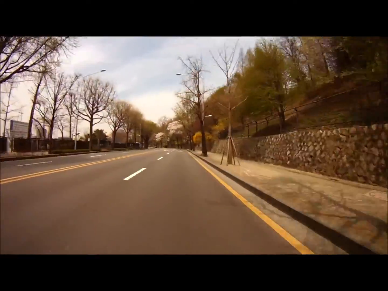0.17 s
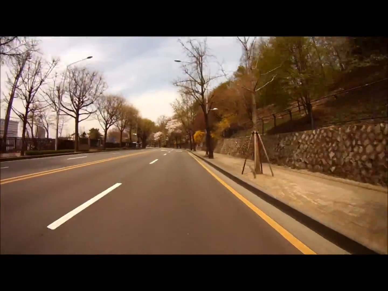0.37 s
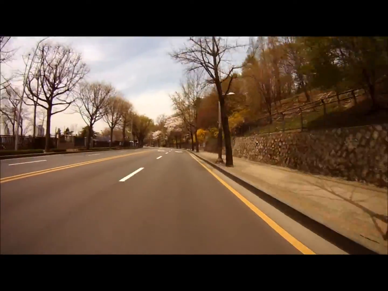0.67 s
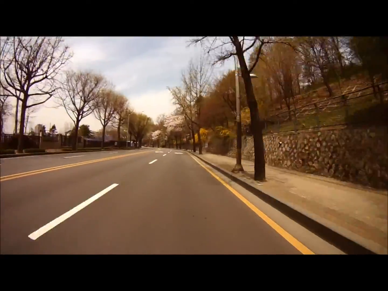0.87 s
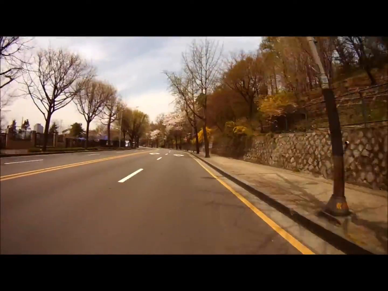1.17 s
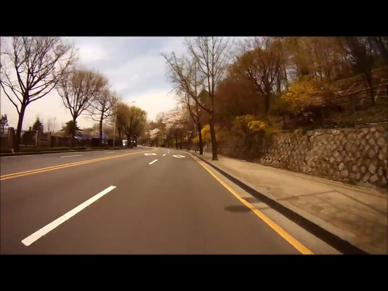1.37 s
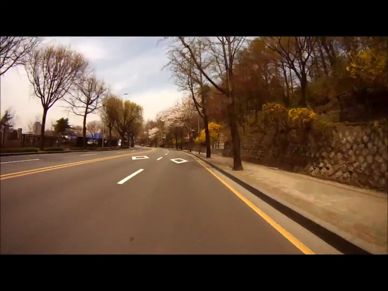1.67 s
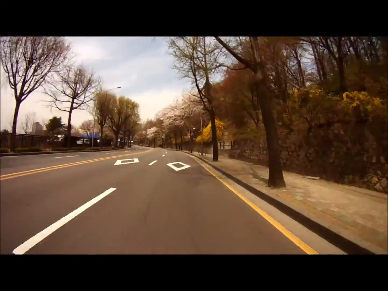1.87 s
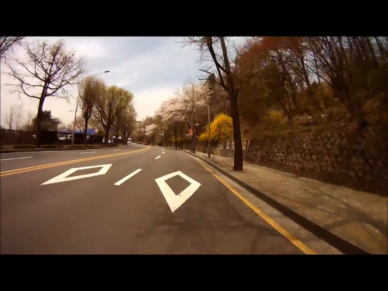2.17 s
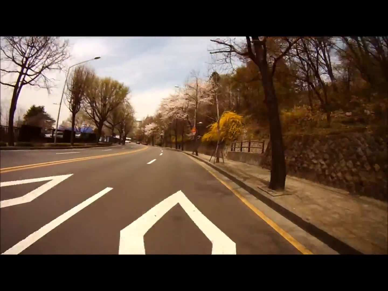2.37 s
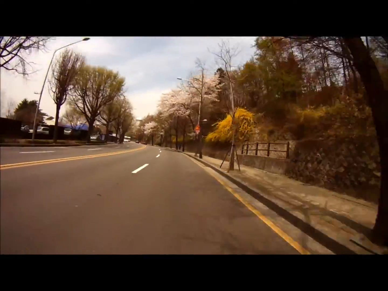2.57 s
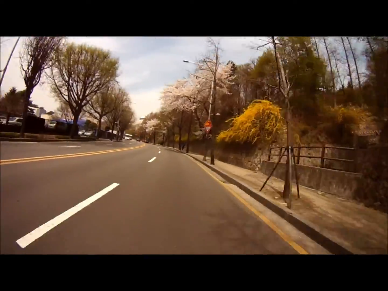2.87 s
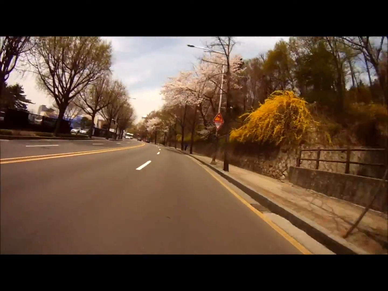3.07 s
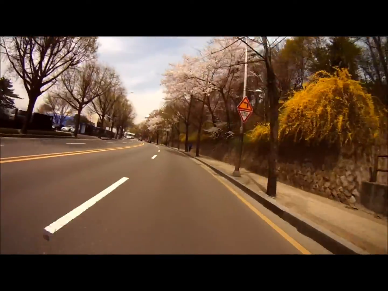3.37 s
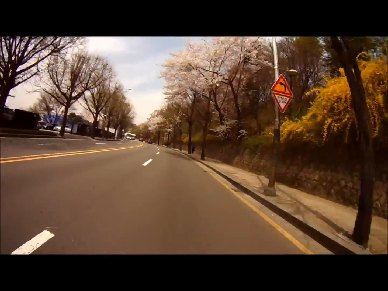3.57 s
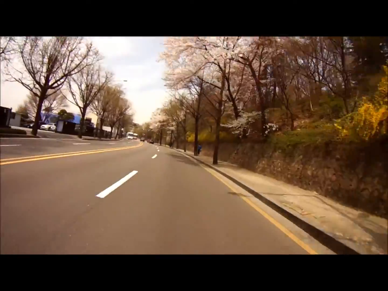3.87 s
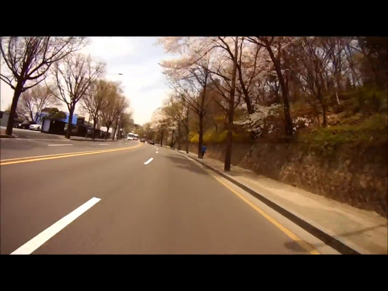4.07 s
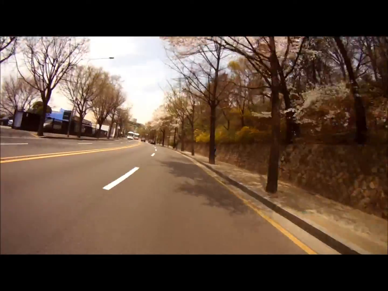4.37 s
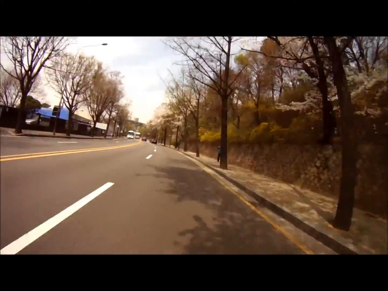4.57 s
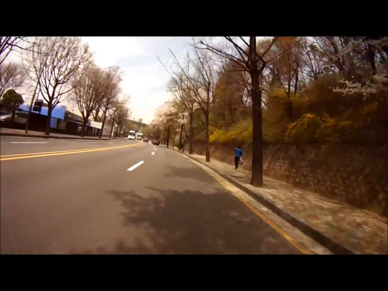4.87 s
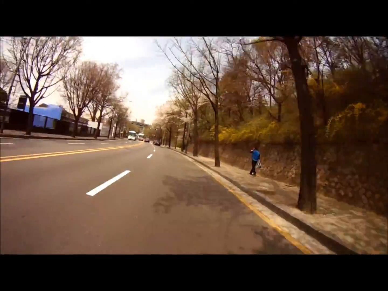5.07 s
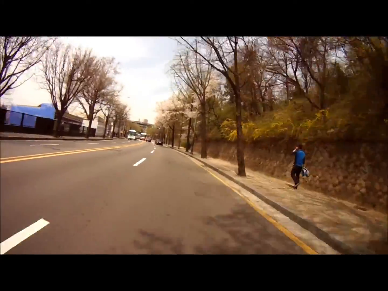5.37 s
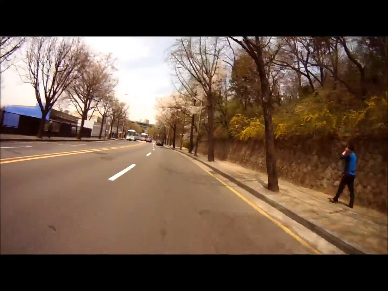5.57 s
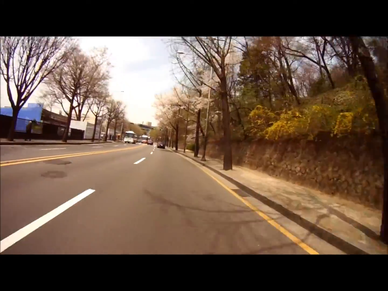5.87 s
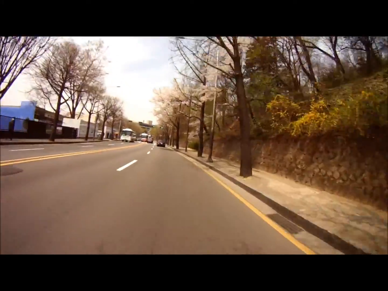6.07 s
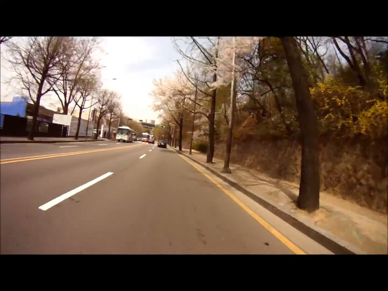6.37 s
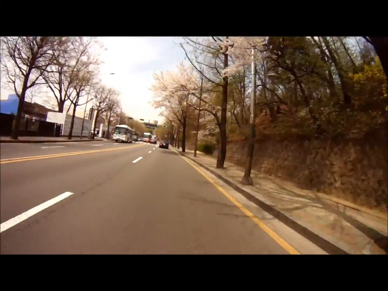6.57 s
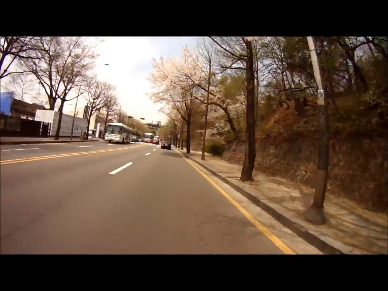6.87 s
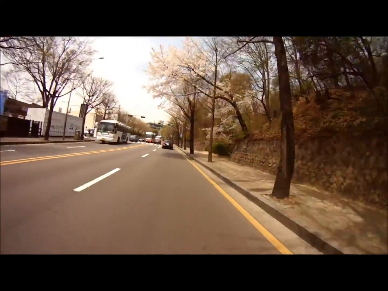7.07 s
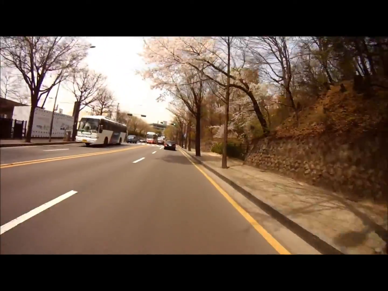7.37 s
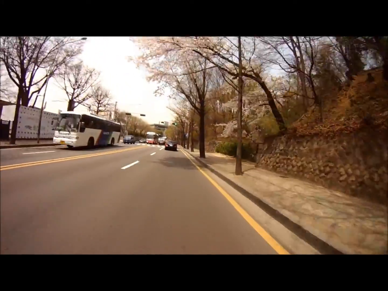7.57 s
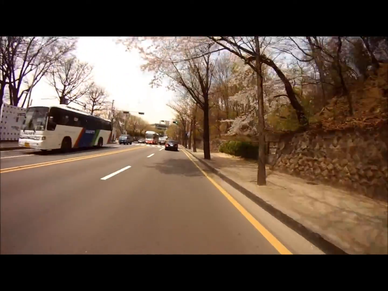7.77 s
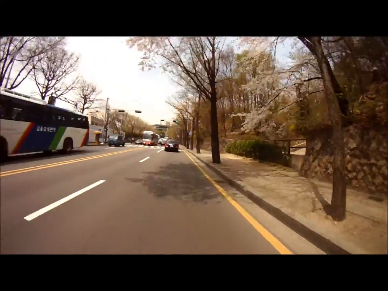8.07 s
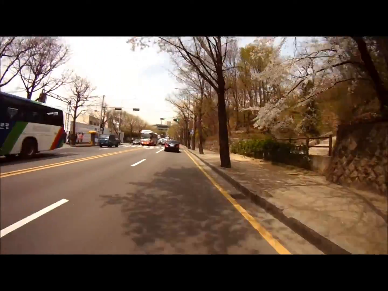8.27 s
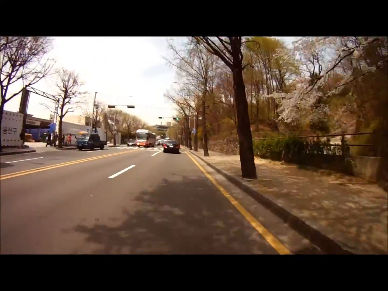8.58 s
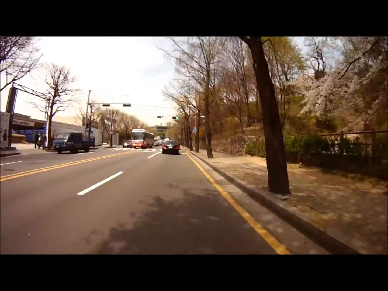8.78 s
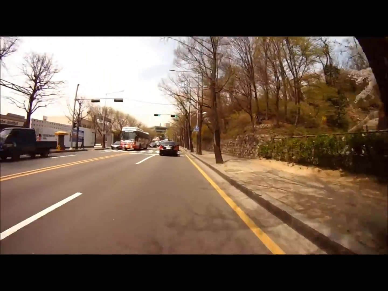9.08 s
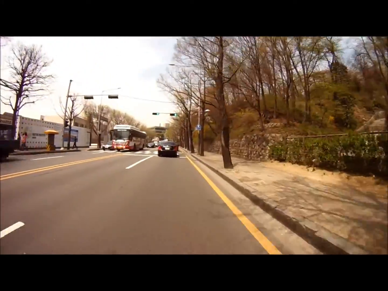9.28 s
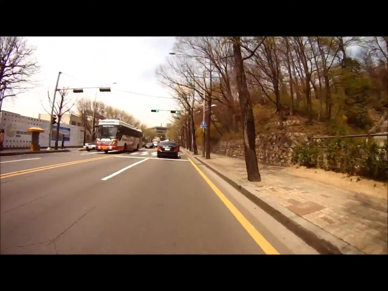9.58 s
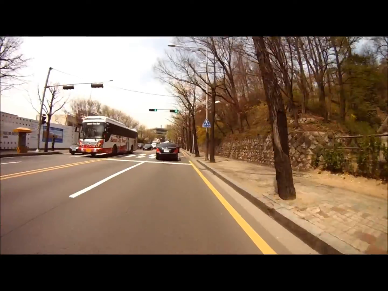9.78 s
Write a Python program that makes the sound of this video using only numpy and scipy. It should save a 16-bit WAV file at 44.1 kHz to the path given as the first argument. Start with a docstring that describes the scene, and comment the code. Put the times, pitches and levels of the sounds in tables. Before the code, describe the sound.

A camera in a closed case on a motorcycle picks up coarse wind hiss, low flutter, tyre roar and a deep engine drone with throbbing mount vibration. The pitch sinks steadily as the bike slows on a city road. Wind falls away sharply after about six seconds, loose parts tick, a hard knock lands near seven seconds, then a downshift lifts the engine briefly before it sinks again.

```python
"""Wind hisses in the microphone port of a closed camera case and buffets it: turbulent noise in flickering bands.
The case rides on a motorcycle that slows down on a city road; wind and road noise sink as it goes.
Its mount swings near 134 Hz as a narrow-band resonator, and amplifies engine and driveline orders at fixed pitches.
Tyre roar and a thin whine come through the case; ticks and knocks are decaying modes, squeaks are gliding tones.
"""
import sys
import numpy as np
from scipy import signal
from scipy.fft import rfft, irfft, next_fast_len
from scipy.io import wavfile
from scipy.ndimage import uniform_filter1d

SR = 44100
rng = np.random.default_rng(int(sys.argv[2]) if len(sys.argv) > 2 else 0)


def persist_wave(psi):
    """Save psi, clipped to +-1, as 16-bit WAV."""
    counts = np.round(np.clip(psi, -1, 1) * 32767).astype(np.int16)
    wavfile.write(sys.argv[1], SR, np.atleast_2d(counts).T)


N = 438354
T = np.arange(N) / SR  # time, s


def undb(db):
    """Level definition: an amplitude ratio is 10^(level / 20 dB)."""
    return 10 ** (np.asarray(db) / 20)


def curves(table):
    """Linear interpolation: the columns of a table are joined by straight lines in time."""
    s, *columns = np.transpose(table)
    return [np.interp(T, s, column) for column in columns]


def lift(hz, modes):
    """Resonance: a body passes everything and adds the power of its modes (f/Hz, width/Hz, level/dB)."""
    power = sum(undb(2 * db) / (1 + (2 * (hz - f) / width) ** 2) for f, width, db in modes)
    return np.sqrt(1 + power)


def walk(rate):
    """Slow random modulation: levels held for 1 / rate s and slewed twice, with a spread near 1."""
    hold = int(SR / rate)
    steps = np.repeat(rng.standard_normal(N // hold + 1), hold)
    return 1.3 * uniform_filter1d(uniform_filter1d(steps, hold), hold)[:N]


def turbulence(shape, modes, shared_db, own_db, rate, tilt_db=0):
    """Broadband turbulence: noise of rms 1 before its octave bands flicker, together and each alone."""
    size = next_fast_len(N)
    hz = np.arange(size // 2 + 1) * SR / size + 1e-3  # offset keeps the logarithm finite
    f, db = np.transpose(shape)
    colour = undb(np.interp(np.log(hz), np.log(f), db, -90, -90)) * lift(hz, modes)
    noise = rfft(rng.standard_normal(size)) * colour
    scale = np.std(irfft(noise, size))
    shared = walk(rate)
    out = 0
    for centre in 2 ** np.arange(np.floor(np.log2(f[0])), np.log2(f[-1]) + 1):
        # neighbouring cosine-squared bands overlap and sum to one
        band = np.cos(np.pi / 2 * np.clip(np.log2(hz / centre), -1, 1)) ** 2
        flicker_db = shared_db * shared + own_db * walk(rate)
        flicker_db = flicker_db + (centre > 3000) * tilt_db  # tilt moves the treble bands only
        out = out + undb(flicker_db) * irfft(noise * band, size)[:N]
    return out / scale


def ring(hz, t60, rise_s):
    """Free decay: one mode dies away by 60 dB in t60; a longer push starts it more softly."""
    t = np.arange(int(t60 * SR)) / SR
    onset = np.sin(np.pi / 2 * np.minimum(t / rise_s, 1)) ** 2
    return np.sin(2 * np.pi * hz * t) * 1000. ** (-t / t60) * onset


def add(out, s, sound):
    """Superposition: a sound is mixed in at time s."""
    i = int(s * SR)
    out[i:i + len(sound)] += sound[:N - i]


SHIFT_S = 0.21  # length of each gradual change
TOP_GEAR_OUT_S, LOW_GEAR_IN_S = 5.9, 7.3


def engaged(s):
    """Gradual engagement: a linear ramp, 0 before time s and 1 once SHIFT_S has passed."""
    return np.clip((T - s) / SHIFT_S, 0, 1)


# Rotation as the ride slows: t/s, crank f/Hz, driveline f/Hz
SPEED = [(0, 86, 86), (1.5, 83.5, 83.5), (1.9, 81.9, 81.9), (2.3, 81.1, 81.1), (3.1, 78.3, 78.3),
         (4.7, 71.1, 71.1), (5.1, 68.3, 68.8), (5.9, 62.9, 65.6), (7.1, 52.3, 53.8), (7.3, 51.5, 53),
         (7.5, 57.8, 51.9), (8.7, 53.6, 47.5), (9.94, 49.2, 43.7)]


def rotation():
    """Rotational kinematics: crank and driveline frequencies over time, Hz."""
    return curves(SPEED)


def speed_db():
    """Speed level: road speed, taken from the driveline, in dB relative to the start."""
    line = rotation()[1]
    return 20 * np.log10(line / line[0])


# Steady wind at the port: t/s, level/dB
WIND = [(0, -26.5), (.6, -26.5), (1.3, -24), (1.69, -25.5), (2.08, -25.5), (2.5, -29.5), (2.85, -26),
        (3.7, -25.5), (4.2, -27.5), (4.6, -30), (5.18, -31), (5.3, -35), (6.19, -37.5), (6.24, -39.5),
        (6.76, -49.5), (8.13, -49), (8.6, -56.5), (9.2, -51.5), (9.94, -54.5)]
CRUISE_DB, SLOW_S = -25.5, 0.54  # wind at cruising speed; time over which the case feels its mean


def steady_wind_db():
    """Mean flow: level of the wind at the port without brief swells or flutter."""
    return curves(WIND)[0]


def pace_db():
    """Temporal averaging: mean wind relative to cruising sets how hard the ride shakes the case."""
    return uniform_filter1d(steady_wind_db(), int(SLOW_S * SR), mode="nearest") - CRUISE_DB


# Spectrum of the microphone's own hiss: f/Hz, relative level/dB per Hz
FLOOR = [(3000, -3.5), (5500, -4), (7000, -5), (8500, -12), (10000, -17.5), (16000, -18)]
FLOOR_DB = -71.5


def floor_hiss():
    """Self-noise: the microphone adds faint, nearly steady noise."""
    return undb(FLOOR_DB) * turbulence(FLOOR, [], .1, .3, 10)


# Short rubs: t/s, length/s, lowest f/Hz, level/dB
SQUEAKS = [(6.488, .022, 2250, -41), (9.448, .016, 1520, -43)]


def squeak():
    """Friction: short rubs whose pitch dips and recovers, roughened by random phase."""
    out = np.zeros(N)
    for s, length, hz, db in SQUEAKS:
        u = np.arange(int(length * SR)) / (length * SR)  # progress through the rub, 0 to 1
        glide = hz * (1 + .08 * (2 * u - 1) ** 2)
        phase = 2 * np.pi * np.cumsum(glide) / SR + .5 * walk(1500)[:len(u)]
        octave = .2 * np.cos(np.pi * u) ** 2 * np.sin(2 * phase)  # its share is largest at both ends
        add(out, s, undb(db) * np.sqrt(np.sin(np.pi * u)) * (np.sin(phase) + octave))
    return out


# Taps of a loose part: t/s, level/dB, then relative level/dB near 2 kHz (before a 5 dB cut), 4 kHz, 5 kHz
TICKS = [(6.2675, -36.5, -2, -16, -19), (6.336, -31.5, 0, -10, -16), (6.3945, -46, 2, -15, -18),
         (6.6129, -33.5, 3.5, -5, -8), (6.7006, -40.5, -2, -10, -19), (6.741, -44, 7, -20, -16),
         (7.4856, -31, 1, -19, -25), (7.638, -51, 6, -14, -4), (7.672, -53, 6, -4, -8),
         (7.78, -53, 4, -11, -11), (7.936, -52, 6, -11, -10), (8.0775, -53, 3, -11, -9),
         (8.1489, -54, 12, -7, -2), (8.2716, -54, 6, -10, 2), (9.105, -52, 3, -11, -12)]
# Modes struck by each tap: f/Hz, relative level/dB, t60/s
TICK_MODES = [(1640, 2, 0.025), (1830, 5, 0.038), (2270, 0.5, 0.039), (3124, 4.5, 0.022), (3910, 7, 0.027),
              (4700, 7, 0.02), (5130, -0.5, 0.018)]


def ticks():
    """Modal excitation: a loose part taps the case, ringing short bright modes balanced anew at each tap."""
    out = np.zeros(N)
    detunings = rng.standard_normal((len(TICKS), len(TICK_MODES)))
    for (s, db, low_db, mid_db, top_db), detuning in zip(TICKS, detunings):
        for (hz, mode_db, t60), a in zip(TICK_MODES, detuning):
            if hz < 2700:
                share_db = low_db - 5
            elif hz < 3600:
                share_db = 0
            else:
                share_db = mid_db if hz < 4400 else top_db
            add(out, s, undb(db + mode_db + share_db) * ring(hz * (1 + 0.015 * a), t60, 0.002))
    return out


# Spectrum of the tyre roar: f/Hz, relative level/dB per Hz
ROAR = [(170, -31), (250, -10), (340, -18), (480, -13.5), (620, -7.5), (760, -11), (1100, -21.5),
        (1550, -20.5), (2900, -40.5), (3400, -47), (3900, -38), (5000, -39.5), (6000, -51), (9000, -72)]
# Resonances of the case: f/Hz, width/Hz, level/dB
CASE = [(527, 56, 6), (633.4, 57, 7), (780, 100, -0.5), (876, 21, 9), (1060, 76, 7)]
ROAD_DB, ROAD_SLOPE, ROAD_POWER = -32.5, 0.27, 0.71  # roar at cruise; dB per dB of wind; power of road speed
WHINE_DB, WHINE_SLOPE = -61.5, .3  # whine at cruise; dB per dB of wind
WHINE_FADES_S, WHINE_FADE_DB_S = 9.3, 10  # start of its fade; dB per s


def road():
    """Structure-borne transmission: tyre roar comes through the case, with a thin whine of a small buzzing part."""
    roar = turbulence(ROAR, CASE, 0.9, 0.73, 16)
    roar_db = ROAD_DB + ROAD_SLOPE * pace_db() + ROAD_POWER * speed_db()
    whine = turbulence([(2900, -8.5), (3140, -3.0), (3400, -12.5)], [(3170, 130, 18)], 2.2, .1, 22)
    fade_db = WHINE_FADE_DB_S * np.maximum(T - WHINE_FADES_S, 0)
    whine_db = WHINE_DB + WHINE_SLOPE * pace_db() - fade_db
    return undb(roar_db) * roar + undb(whine_db) * whine


# Engine load: t/s, relative level/dB
LOAD = [(0, -3.5), (1, -2), (3, -0.5), (4, 1), (5, -2.5), (5.8, -10), (6.4, -6.5), (7.2, -12.5), (7.5, -10),
        (8.2, -10.5), (9.94, -8)]
# Crank tones: order, level/dB before load and mount
CRANK = [(1, -38), (2, -44), (3, -58)]
# Driveline tone: order, level/dB before unloading and mount
DRIVELINE = [(4, -59.5)]
# Gear meshes of the top gear: order of the driveline, level/dB before mesh level and mount
TOP_GEAR = [(5.75, -64), (6, -62), (6.65, -62), (8, -62), (8.57, -60)]
# Gear meshes of the low gear: order of the driveline, level/dB before mesh level and mount
LOW_GEAR = [(2.47, -42), (4.95, -67)]
# Resonances of the mount: f/Hz, width/Hz, level/dB
MOUNT = [(54, 14, 5), (77, 9, 14), (133, 14, 5), (168, 30, 9), (220, 10, 18), (260, 16, 8), (333, 16, 14),
         (570, 160, 13)]
TOP_MESH_DB, TOP_MESH_SLOPE = 1.5, .5  # at cruise; dB per dB of wind
LOW_MESH_DB, FREE_DB = -2.5, -41  # low mesh; drop of a mesh that is out of gear
UNLOAD_DB = -8  # the driveline quietens in the low gear


def drive():
    """Order excitation: each order is a tone that swells as it crosses a mount resonance; levels wander."""
    crank, line = rotation()
    load_db = curves(LOAD)[0]
    line_db = UNLOAD_DB * engaged(LOW_GEAR_IN_S)
    top_db = TOP_MESH_DB + TOP_MESH_SLOPE * pace_db() + FREE_DB * engaged(TOP_GEAR_OUT_S)
    low_db = LOW_MESH_DB + FREE_DB * (1 - engaged(LOW_GEAR_IN_S - SHIFT_S / 2))
    # rotation, orders, level, spread of the wandering level in dB
    sources = ((crank, CRANK, load_db, 1.3), (line, DRIVELINE, line_db, 1.6),
               (line, TOP_GEAR, top_db, 3.), (line, LOW_GEAR, low_db, 1.6))
    out = 0
    for hz, orders, db, patchy_db in sources:
        hz = hz * (1 + 0.0018 * walk(6))
        phase = 2 * np.pi * np.cumsum(hz) / SR
        for order, order_db in orders:
            tone = np.sqrt(2) * np.sin(order * phase + rng.uniform(0, 2 * np.pi))
            level_db = order_db + db + patchy_db * walk(4)
            out = out + undb(level_db) * lift(order * hz, MOUNT) * tone
    return out


# Jolts: t/s, level/dB, length of the push/s
KNOCKS = [(6.85, -17.5, 0.003), (6.86, -26, 0.004), (7.317, -26, 0.003), (7.458, -43, 0.0027),
          (8.48, -34, 0.003), (9.439, -40, 0.003), (9.495, -37, 0.0032), (9.672, -31.5, 0.0036),
          (9.689, -35, 0.0025), (9.848, -32.5, 0.0026), (9.877, -32, 0.003)]
# Modes rung by each jolt: f/Hz, relative level/dB, t60/s
KNOCK_MODES = [(574.1, -6.5, .08), (643.6, 3, 0.096), (800, -10.5, .06), (1280, -20.5, .04),
               (1615, -19, 0.046)]
# Spectrum of the crack: f/Hz, relative level/dB per Hz
CRACK = [(2000, -10), (4300, 0), (5300, -16), (6700, -14), (11000, -36)]
CRACK_DB, CRACK_T60_S = -41, 0.046


def knocks():
    """Impact excitation: a jolt rings the case and adds a brief noise crack, slightly stronger for harder jolts."""
    out = np.zeros(N)
    crack = turbulence(CRACK, [], .1, .1, 9)
    fade = 1000. ** (-T[:int(CRACK_T60_S * SR)] / CRACK_T60_S)
    detunings = rng.standard_normal((len(KNOCKS), len(KNOCK_MODES)))
    for (s, db, push_s), detuning in zip(KNOCKS, detunings):
        for (hz, mode_db, t60), a in zip(KNOCK_MODES, detuning):
            mode = ring(hz * (1 + 0.0036 * a), t60, max(push_s, .001))
            add(out, s, undb(db + mode_db + 1.0) * mode)
        burst = fade * crack[int(s * SR):][:len(fade)]
        add(out, s - .003, undb(1.05 * (db + 10.5) + CRACK_DB) * burst)  # leads the ring by 3 ms
    return out


# Swells of the mount's swing: bumps push it, and from 4.5 to 5.9 s the second engine order drives it
# t/s, length/s, level/dB, starting f/Hz
MOUNT_SWELLS = [(.013, 0.027, -20.5, 127.5), (.225, 0.033, -21, 134), (.368, 0.13, -22, 129.2),
                (.608, 0.044, -23, 139.3), (.785, 0.12, -19.5, 131), (.987, 0.049, -19, 131.9),
                (1.384, 0.031, -21, 129.5), (2.144, 0.087, -21.5, 137), (2.739, 0.21, -23.5, 132.7),
                (2.98, 0.058, -18.5, 135), (3.09, .05, -25, 137), (3.256, 0.11, -18.5, 134),
                (3.543, .052, -25, 139.7), (3.864, 0.21, -22.5, 132.4), (4.122, 0.044, -18.5, 142),
                (4.255, .042, -25, 131.2), (4.579, 0.094, -20.5, 134.2), (4.724, 0.19, -20.5, 140.3),
                (5.03, 0.076, -24, 137), (5.243, 0.33, -21.5, 134.7), (5.64, .28, -25, 130.6),
                (6.251, 0.053, -28, 127.2), (6.35, 0.096, -28.5, 141), (6.51, .14, -31.5, 138.6),
                (6.69, .138, -27, 137), (6.855, 0.067, -19.5, 134), (7.053, .18, -33, 130.5),
                (7.374, 0.04, -28, 131.2), (7.46, 0.27, -31.5, 131), (7.96, 0.22, -31, 132.1),
                (8.3, 0.16, -30.5, 135), (8.56, .15, -29, 132), (8.85, .11, -31.5, 132.2),
                (9.01, .1, -33, 128)]
SWELL_RISE_S, SWELL_T60_S = .025, .15
SWAY_HZ, SWAY_WIDTH_HZ = 133.9, 13
SWAY_DB, SWAY_SLOPE, SWAY_POWER = -33, .05, 1.8  # at cruise; dB per dB of wind; power of road speed
GLIDE_FROM_S = 4.5  # swells that start between here and the end of top gear glide with engine speed


def swing():
    """Forced resonance: rough tarmac keeps the mount swinging; bumps, then the second engine order, swell it.

    Swells of the engine order glide down in proportion to engine speed; the others hold their pitch.
    """
    shape = [(100, -20), (SWAY_HZ, 0), (170, -20)]
    sway = turbulence(shape, [(SWAY_HZ, SWAY_WIDTH_HZ, 20)], 1.2, .1, 9)
    out = undb(SWAY_DB + SWAY_SLOPE * pace_db() + SWAY_POWER * speed_db()) * sway
    crank = rotation()[0]
    for (s, length, db, hz), turn in zip(MOUNT_SWELLS, rng.random(len(MOUNT_SWELLS))):
        t = np.arange(int((length + SWELL_T60_S) * SR)) / SR
        rise = np.sin(np.pi / 2 * np.minimum(t / SWELL_RISE_S, 1)) ** 2
        decay = undb(-60 * np.maximum(t - length, 0) / SWELL_T60_S)
        engine = crank[int(s * SR):][:len(t)]
        glide = engine / engine[0] if GLIDE_FROM_S < s < TOP_GEAR_OUT_S else np.ones(len(t))
        tone = np.sin(2 * np.pi * (np.cumsum(hz * glide) / SR + turn))
        add(out, s, np.sqrt(2) * undb(db) * rise * decay * tone)
    return out


# Brief swells of the hiss: gusts, and short bursts that go with knocks and ticks at 6.84, 7.31, 7.47 s
# t/s, rise over the steady wind level/dB, hold/s
HISS_SWELLS = [(.69, 0.5, .02), (.86, 1, .08), (1.094, 0.5, .04), (1.378, 3, 0.12), (1.53, 3, .04),
               (2.527, 5, .17), (3.0, 1.5, .1), (3.172, 3, .12), (4.0, 0.5, 0.18), (5.538, 2.5, .03),
               (6.06, 1.5, 0.089), (6.248, 2.5, .02), (6.84, 2, .02), (7.31, 2.5, .04), (7.47, 3, .03),
               (9.43, 3, .02)]
HISS_RISE_S, HISS_FALL_S = 0.025, 0.045  # linear rise time; decay time constant
CALM_S, CALM_TREBLE_DB = 6.2, -6.5  # from here the flow stops tearing at the port edge: the hiss turns dull
FLUTTER_FROM_S, FLUTTER_DB, FLUTTER_HZ = 5.5, 2, 70  # just before that the flow breaks up


def wind_db():
    """Unsteady flow: brief swells rise, hold and die away over the steady wind; it flutters as the flow breaks up."""
    db = steady_wind_db()
    for s, rise_db, hold_s in HISS_SWELLS:
        u = np.maximum(T - s, 0)
        fall = np.exp(-np.maximum(u - HISS_RISE_S - hold_s, 0) / HISS_FALL_S)
        db = db + rise_db * np.minimum(u / HISS_RISE_S, 1) * fall
    return db + FLUTTER_DB * engaged(FLUTTER_FROM_S) * (T < CALM_S) * walk(FLUTTER_HZ)


# Spectrum of the hiss: f/Hz, relative level/dB per Hz
HISS = [(200, -37), (300, -12.5), (450, -16), (800, -16.5), (1180, -7.5), (1540, -2.5), (2090, -13),
        (2870, -18.5), (3740, -19.5), (5000, -29.5), (5700, -40.5), (7000, -46), (8300, -52), (9500, -63),
        (12000, -70)]
# Resonances of the microphone port: f/Hz, width/Hz, level/dB
PORT = [(1542, 400, 3), (3860, 500, 0)]
# Spectrum of the buffeting: f/Hz, relative level/dB per Hz
BUFFET = [(15, -2), (30, 6), (60, -0.5), (100, -5.5), (170, -11.5), (220, -14.5), (300, -27.5), (420, -45),
          (700, -54.5)]
TREBLE_DB, TREBLE_SLOPE = 0.4, .1  # treble tilt at cruise; dB per dB of wind
BUFFET_DB, BUFFET_SLOPE = -22, 0.44  # at cruise; dB per dB of wind


def wind():
    """Aeroacoustic noise: hiss coloured by the port, brighter when stronger, over low buffeting of the case."""
    hiss_db = wind_db()
    calm = np.clip((T - CALM_S) / HISS_RISE_S, 0, 1)
    tilt_db = TREBLE_DB + TREBLE_SLOPE * (hiss_db - CRUISE_DB) + CALM_TREBLE_DB * calm
    hiss = turbulence(HISS, PORT, 0.73, 0.46, 28, tilt_db)
    buffet = turbulence(BUFFET, [(142, 30, 8.8)], 0.69, 0.42, 5)
    buffet_db = BUFFET_DB + BUFFET_SLOPE * pace_db()
    return undb(hiss_db) * hiss + undb(buffet_db) * buffet


def scene():
    """Superposition: everything adds at one microphone, over its own faint hiss."""
    background = floor_hiss() + squeak() + ticks() + road()
    return (background + drive() + knocks() + swing() + wind())[None]


def record(dry):
    """Band limitation: a steep low-pass, already settled at the start, cuts the top."""
    top_hz = 14200
    sos = signal.ellip(10, .2, 60, top_hz, fs=SR, output="sos")
    return signal.sosfilt(sos, dry, zi=signal.sosfilt_zi(sos)[:, None] * dry[:, :1])[0]


dry = scene()
out = record(dry)
persist_wave(out)
```